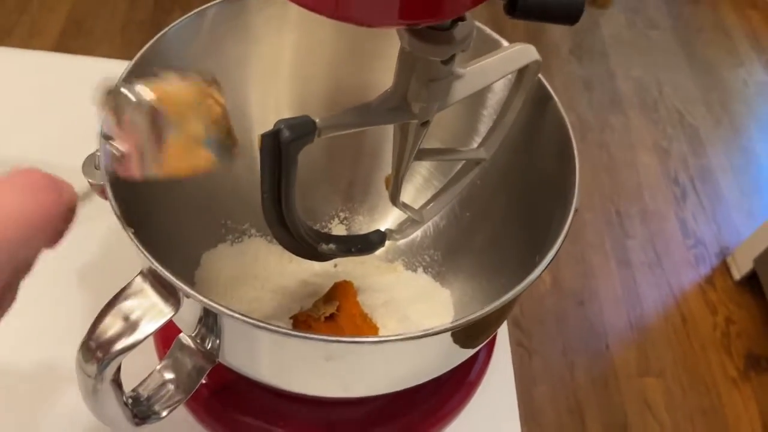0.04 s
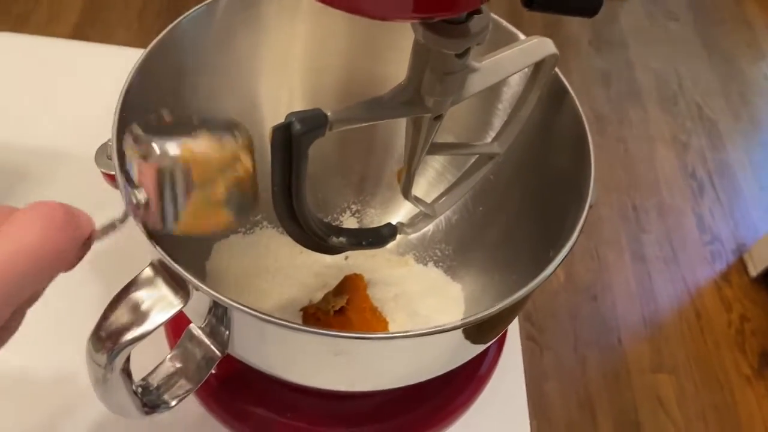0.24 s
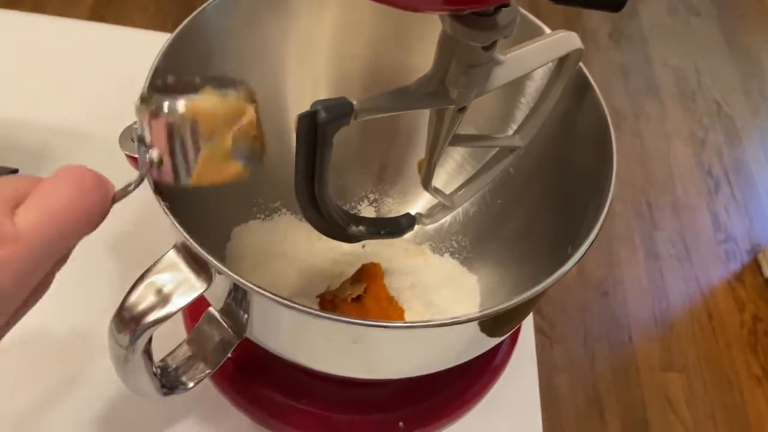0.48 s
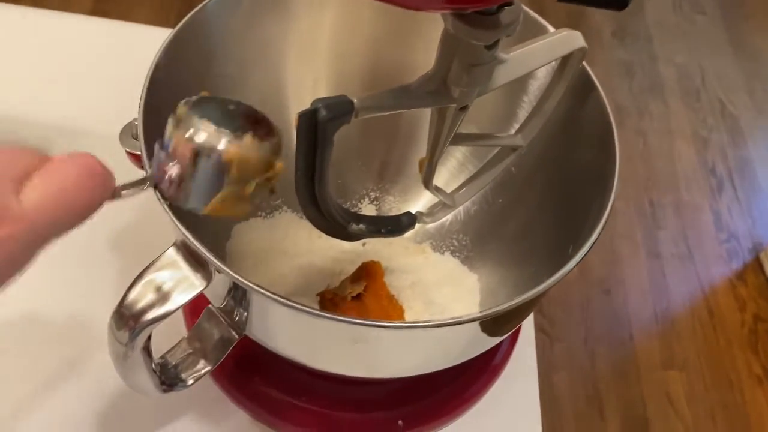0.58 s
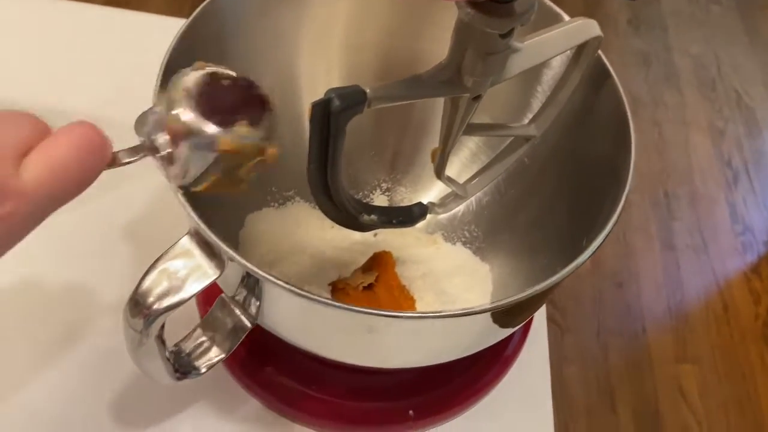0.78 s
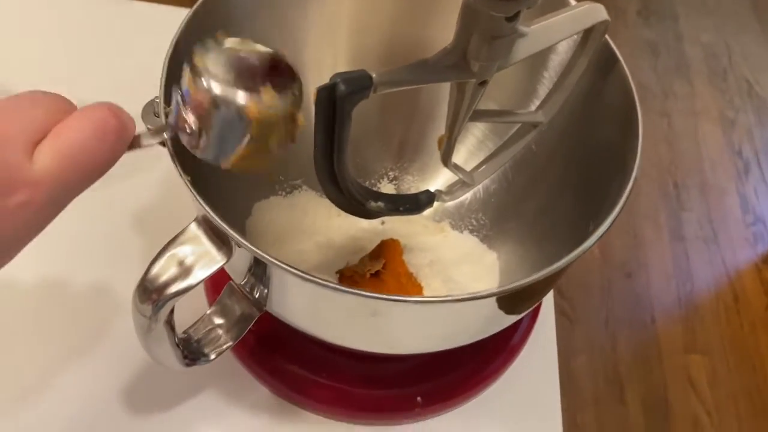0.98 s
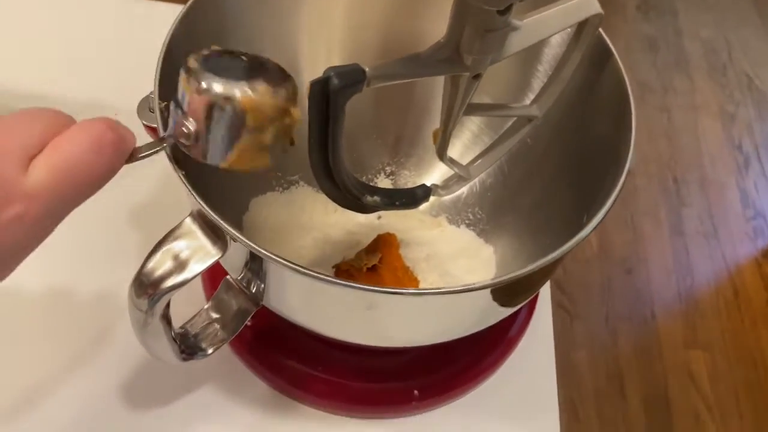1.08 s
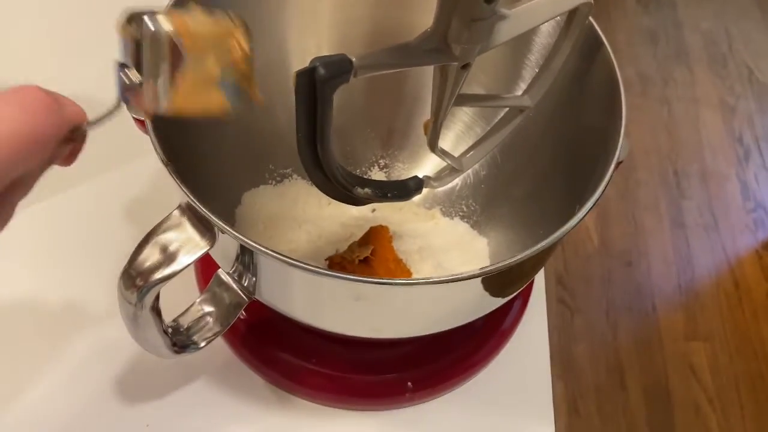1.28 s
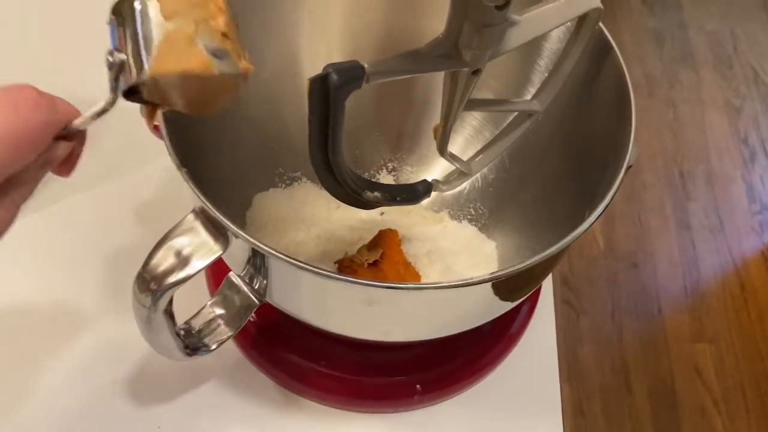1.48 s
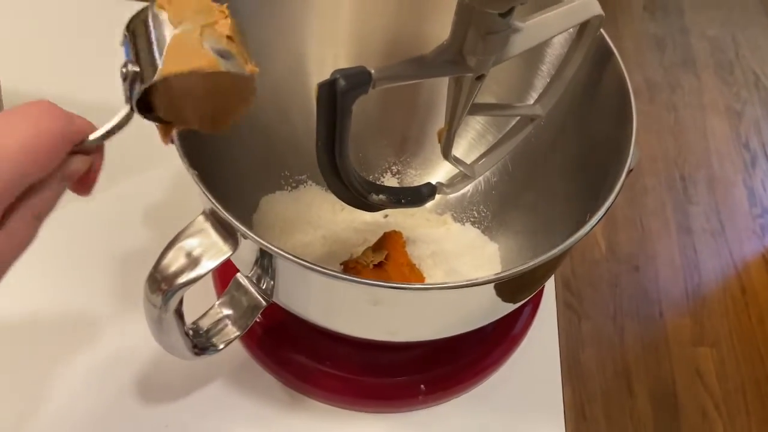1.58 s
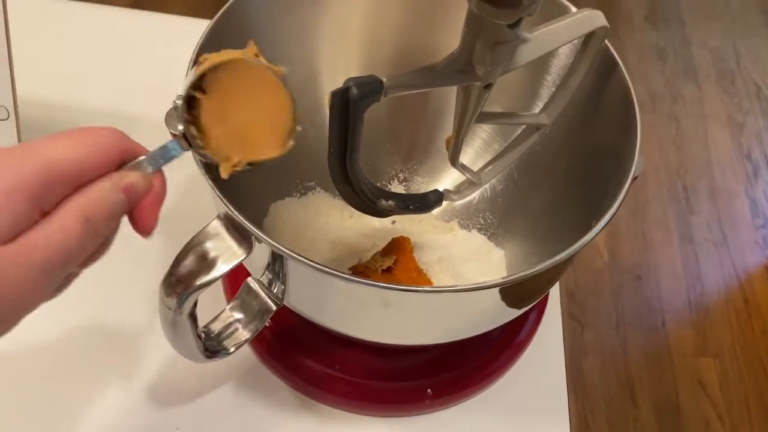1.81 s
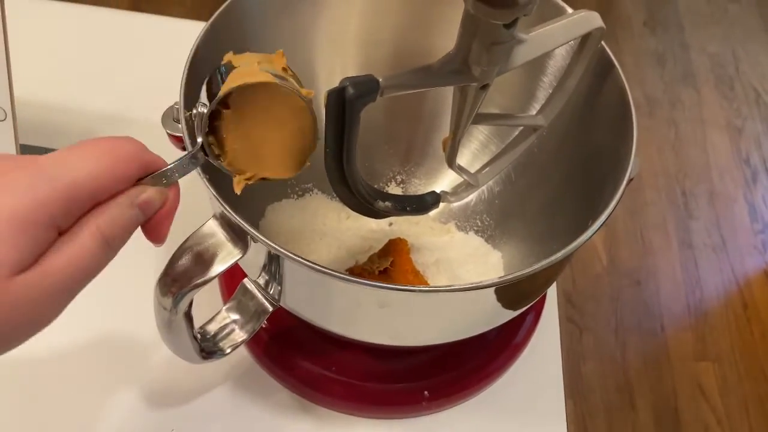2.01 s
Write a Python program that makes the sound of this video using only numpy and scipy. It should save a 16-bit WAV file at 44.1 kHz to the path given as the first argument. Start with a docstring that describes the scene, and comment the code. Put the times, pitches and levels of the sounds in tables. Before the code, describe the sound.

A steel measuring spoon knocks on the rim of a steel mixing bowl, close up in a small kitchen. A clank is already fading at the start; more follow at about 0.15, 0.3, 0.5 and 0.75 seconds, bright and briefly ringing. The first and last bounce, the last being loudest and slightly overloaded. The mixer stand rumbles faintly underneath. After a pause, one softer knock rings at 1.75 seconds.

```python
"""A steel measuring spoon knocks on the rim of a steel mixer bowl to shake off sticky food.
Each knock is a short clank, choked while the spoon presses on the rim; on a rebound it rings freely.
The bowl shimmers on in a small kitchen, the mixer stand rocks, and the close microphone overloads."""
import sys
import numpy as np
from scipy import signal
from scipy.fft import rfft, irfft
from scipy.io import wavfile

SR = 44100
rng = np.random.default_rng(int(sys.argv[2]) if len(sys.argv) > 2 else 0)


def file_out(sig):
    """Save sig as 16-bit WAV at sys.argv[1]."""
    # one column per channel
    cols = np.atleast_2d(sig).T
    # limit, then scale
    lim = np.clip(cols, -1, 1)
    pcm = np.round(lim * 32767).astype(np.int16)
    wavfile.write(sys.argv[1], SR, pcm)


N = 90404
RING_N = 32768  # samples per knock


def amp(db):
    """dB to gain."""
    return 10 ** (np.asarray(db) / 20)


def read(points, hz):
    """Interpolate a table over log frequency."""
    f, value = np.transpose(points)
    return np.interp(np.log(hz + 1), np.log(f + 1), value)


def add(mix, start_s, sound):
    """Mix a sound in at start_s, which may be negative."""
    at = round(start_s * SR)
    sound = sound[max(-at, 0):]
    part = mix[max(at, 0):][:len(sound)]
    part += sound[:len(part)]


def dense(spectrum, size):
    """Random-phase partials under a spectral envelope, rms 1."""
    hz = np.fft.rfftfreq(size, 1 / SR)
    phases = np.exp(2j * np.pi * rng.random(len(hz)))
    x = irfft(amp(read(spectrum, hz)) * phases * (hz > 0), size)
    return x / x.std()


def ring(modes_hz, levels_db, t60_s, t, neighbours=3):
    """Decaying modes; each beats with weaker neighbours, so the lines waver."""
    spread_hz, neighbour_db, spot_spread_db = 32, -8.5, 2.5
    out = np.zeros(len(t))
    for hz, db, t60 in np.broadcast(modes_hz, levels_db, t60_s):
        age = t[t < 1.3 * t60]
        near_hz = hz + spread_hz * rng.standard_normal((neighbours, 1))
        near = np.sin(2 * np.pi * (near_hz * age + rng.random((neighbours, 1)))).sum(0)
        cluster = np.sin(2 * np.pi * (hz * age + rng.random())) + amp(neighbour_db) * near
        spot_db = spot_spread_db * rng.standard_normal()  # each knock lands on a different spot
        out[:len(age)] += amp(db + spot_db - 60 * age / t60) * cluster
    return out


def room_air(rms_db=-51.5):
    """Steady, quiet room noise."""
    spectrum = [(25, -12), (58, 0), (95, -14), (152, -7.5), (210, -17.5), (430, -14.5), (700, -27),
                (1250, -29.5), (2100, -36.5), (2800, -31), (3400, -36), (5000, -43), (7000, -43),
                (16000, -52)]  # air noise: f/Hz, relative density/dB
    return amp(rms_db) * dense(spectrum, N)


def stand_rumble():
    """Deep rumble of the rocking mixer stand."""
    rocking = [(0, -29.5), (.3, -30.5), (0.422, -20), (.6, -35), (0.718, -36), (.9, -28.5), (1.051, -37.5),
               (1.2, -38), (2.05, -40)]  # rumble envelope: t/s, level/dB
    spectrum = [(4, 0.5), (11, -1), (24, -11.5), (36, -13), (52, -27), (120, -49), (400, -86)]  # rumble: f/Hz, relative density/dB
    level_db = np.interp(np.arange(N) / SR, *np.transpose(rocking))
    return amp(level_db) * dense(spectrum, N)


def tick(t, t60_s=0.0045):
    """Bright burst at the instant of contact."""
    spectrum = [(200, -15.5), (2000, -5), (7000, 4), (16000, 15.5)]  # contact noise: f/Hz, relative density/dB
    return amp(-60 * t / t60_s) * dense(spectrum, len(t))


def clank(t, t60_s=0.073):
    """Dense upper modes of the struck steel, dying fast."""
    spectrum = [(40, -22), (130, 5.5), (500, -2.5), (1000, -3), (1550, -3), (1720, -11.5), (1950, 4.5),
                (2750, 1.5), (3100, -7), (3480, -11), (3700, 0), (4800, -3), (7000, -1), (7700, -8),
                (10000, -9), (16000, -19)]  # dense modes: f/Hz, relative density/dB
    return amp(-60 * t / t60_s) * dense(spectrum, len(t))


def shimmer(t, rise_s=0.01):
    """The bowl's dense modes linger in the kitchen; the highest die first."""
    spectrum = [(40, -12.5), (140, 1), (270, -14.5), (430, 3), (680, -2), (1200, 6.5), (1650, -5),
                (2150, -1), (2500, -5), (2750, -9), (3000, -6.5), (3450, -15), (3750, -2.5), (4400, -1),
                (4950, -11), (5200, -5.5), (5850, -5), (6300, -12), (7300, -5.5), (8200, -7), (9400, -6),
                (10400, -8), (11400, -7), (16000, -31)]  # lingering modes: f/Hz, relative density/dB
    decay = [(150, 0.49), (1200, 0.46), (4000, .55), (9000, 0.43), (15000, 0.13)]  # their decay: f/Hz, T60/s
    hz, frame_s, frames = signal.stft(dense(spectrum, len(t)), SR, nperseg=256)
    fade = amp(-60 * frame_s / read(decay, hz)[:, None])
    tail = signal.istft(frames * fade, SR)[1][:len(t)]
    return tail * (1 - np.exp(-t / rise_s))


def choked_ring(t):
    """Spoon and rim modes, damped while they touch."""
    # contact modes: f/Hz, relative level/dB, T60/s
    modes_hz = [140, 425, 727, 975, 1560, 2110, 2420, 2650, 4600, 5182, 5840, 6425, 6880, 7100]
    levels_db = [-18.5, -8.5, -6, -5, -9, -10, -31, 2.5, -5, -2.5, -8.5, -9.5, -7.5, -7]
    t60_s = [0.12, 0.06, 0.086, 0.093, 0.068, 0.1, 0.02, 0.048, 0.058, 0.092, 0.14, 0.067, 0.033, 0.03]
    return ring(modes_hz, levels_db, t60_s, t, neighbours=0)


def spoon_ring(t):
    """The spoon rings freely on a rebound."""
    # spoon modes: f/Hz, relative level/dB, T60/s
    modes_hz = [3700, 3731, 3926, 4010, 4075, 4169, 4366, 4635, 5141, 5738, 5920, 7222]
    levels_db = [-20, -19, -12, -2, -19, -13, -17, -28, -17, -14, -13, -23]
    t60_s = [.46, .48, .38, .2, .25, .22, .28, .45, .22, .17, .18, .3]
    return ring(modes_hz, levels_db, t60_s, t)


def bowl_ring(t):
    """The struck bowl wall rings on."""
    # wall modes: f/Hz, relative level/dB, T60/s
    modes_hz = [218, 920, 1148, 1217, 1303, 1875, 2133, 2254, 2670, 3660]
    levels_db = [-28.5, -23, -22, -24, -24, -19, -20.5, -20, -27, -25.5]
    t60_s = [0.58, 0.47, 0.25, 0.55, .6, 0.29, 0.49, 0.16, .4, 0.4]
    return ring(modes_hz, levels_db, t60_s, t)


def seated_ring(t):
    """Spoon and bowl ring together when the spoon stays seated on the rim."""
    # joint modes: f/Hz, relative level/dB, T60/s
    modes_hz = [290, 420, 517, 865, 1145, 1303, 1600, 3203, 3644, 3860, 4037, 4620, 6400, 6850]
    levels_db = [-24, -7, -15.5, -21, -18.5, -9, -12.5, -14, -15.5, -25, -16.5, -26, -3.5, -5.5]
    t60_s = [.6, .16, .45, .6, .33, .27, .25, .2, .56, .6, .32, .45, .12, .13]
    return ring(modes_hz, levels_db, t60_s, t)


def rim_zing(t, t60_s=0.35):
    """High modes of the thin rim."""
    # rim modes: f/Hz, relative level/dB
    modes_hz = [7230, 7467, 7620, 8890, 9160, 9400, 9534, 9722, 11100, 11460]
    levels_db = [-26, -27.5, -30.5, -35, -24.5, -32.5, -27, -33.5, -39.5, -36]
    return ring(modes_hz, levels_db, t60_s, t)


def knock(level_db, bass_db, mid_db, treble_db, top_db,
          clank_db, choked_db, spoon_db, bowl_db, seated_db, zing_db, shimmer_db):
    """One contact: an equalised impact plus the modes that the spoon's landing lets ring."""
    modes_db, attack_s = -6, 0.0007
    t = np.arange(RING_N) / SR
    impact = (amp(-7.5) * tick(t)
              + amp(clank_db + 0.5) * clank(t)
              + amp(shimmer_db - 17) * shimmer(t)
              + amp(choked_db + modes_db) * choked_ring(t))
    # impact colour: f/Hz, gain/dB
    colour = [(500, bass_db), (1540, 0), (2500, mid_db), (3400, 0), (5500, treble_db), (9500, top_db)]
    hz = np.fft.rfftfreq(2 * RING_N, 1 / SR)
    impact = irfft(rfft(impact, 2 * RING_N) * amp(read(colour, hz)))[:RING_N]
    ringing = (amp(spoon_db) * spoon_ring(t)
               + amp(bowl_db) * bowl_ring(t)
               + amp(seated_db) * seated_ring(t)
               + amp(zing_db) * rim_zing(t))
    attack = 1 - np.exp(-t / attack_s)
    return amp(level_db) * (impact + amp(modes_db) * ringing) * attack


def kitchen(x, wet_db=-16, t60_s=0.5, delay_s=0.0013):
    """Add scattered reflections, drawn anew per knock as the spoon moves."""
    t = np.arange(RING_N // 2) / SR
    taps = rng.standard_normal(len(t)) * (rng.random(len(t)) < 0.1)
    taps *= (t > delay_s) * amp(-60 * t / t60_s)
    reflections = signal.fftconvolve(x, taps / np.linalg.norm(taps))[:len(x)]
    return x + amp(wet_db) * reflections


def scene():
    """Knocks over room air and stand rumble, mono."""
    # spoon contacts: t/s, level/dB, then offsets/dB: bass, mid, treble, top,
    # clank, choked, spoon, bowl, seated, zing, shimmer
    knocks = [(-0.055, -4, 2, 1, -0.5, 1, 5, -17, -18, 0, -18.5, 5, -0.5),
              (0.1367, -2, 1.5, 0, 2.5, 4, 0, 1, -22, 2.5, -24.5, 5, 2.5),
              (0.1684, -9.5, -6.5, -3, -4.5, -10, 4, -6.5, 1, 8, -5, 4, -2.5),
              (0.3232, 0, -0.5, 3, 3, 1.5, -2.5, 0.5, -9, -0.5, -30, -10.5, 0.5),
              (0.5044, -6, 5, 3, -1.5, -0.5, -1, 0.5, -20, 3, -18.5, -8.5, 1),
              (0.7277, 1, -3, -4, -8.5, -6.5, 0, -1, -22.5, 1.5, -10.5, -8, 1),
              (0.7470, 1.5, -6.5, -3, 2.5, 1, -0.5, -8.5, 4.5, -7, -23.5, -6.5, 4.5),
              (1.7486, -7.5, -7.5, -8.5, -9, -5.5, 2.5, -19, -24.5, -19.5, -1.5, -7, 5)]
    mix = room_air() + stand_rumble()
    for start_s, *levels_db in knocks:
        add(mix, start_s, kitchen(knock(*levels_db)))
    return mix[None]


def record(dry):
    """Overload flattens the loudest peaks; a low-pass limits the band."""
    ceiling, knee, cutoff_hz = 0.92, 11, 16200
    clipped = dry / (1 + abs(dry / ceiling) ** knee) ** (1 / knee)
    lowpass = signal.firwin(401, cutoff_hz, window=("kaiser", 8), fs=SR)
    return signal.oaconvolve(clipped, lowpass[None], "same")


dry = scene()
out = record(dry)
file_out(out)
```